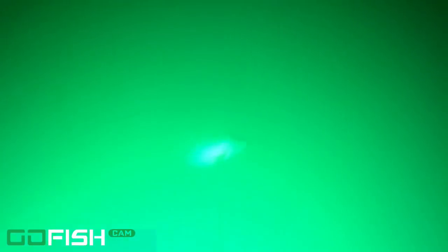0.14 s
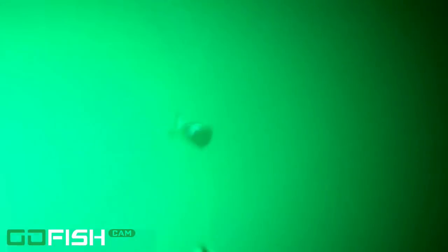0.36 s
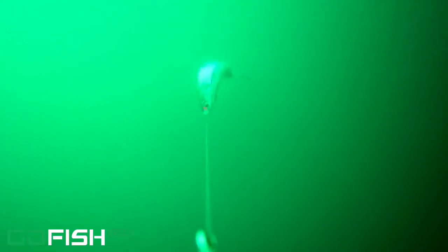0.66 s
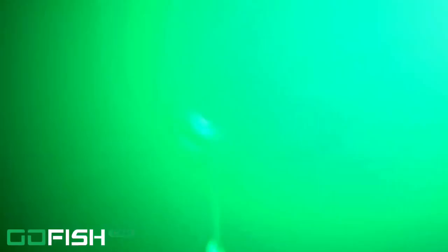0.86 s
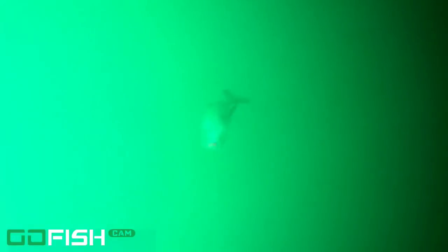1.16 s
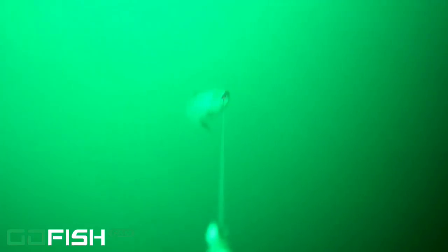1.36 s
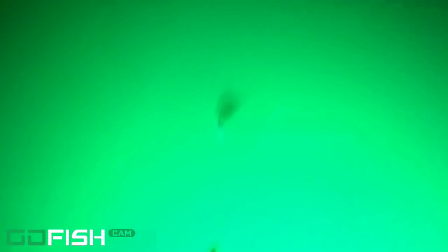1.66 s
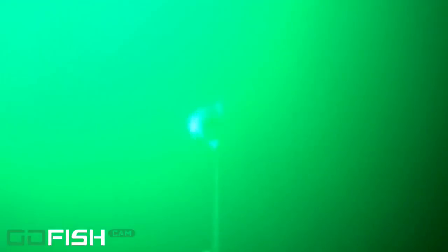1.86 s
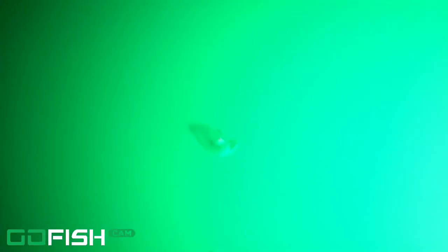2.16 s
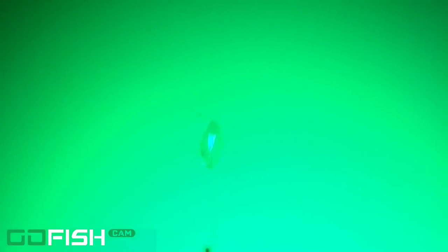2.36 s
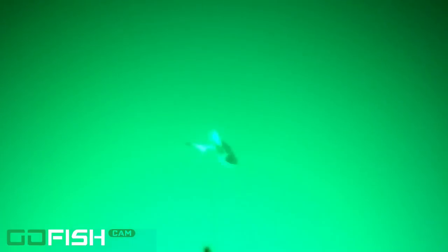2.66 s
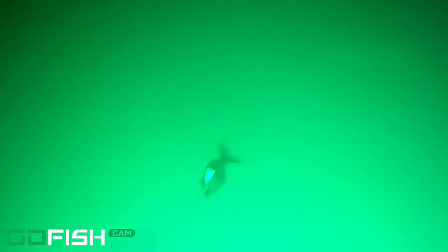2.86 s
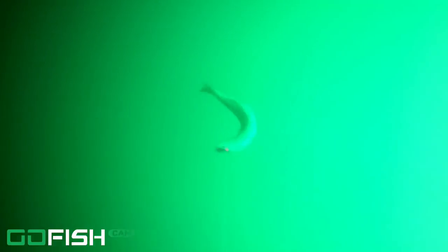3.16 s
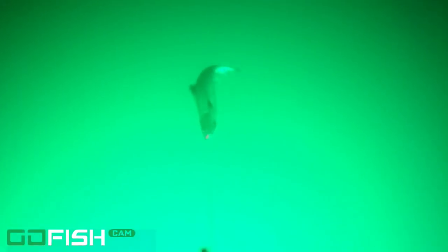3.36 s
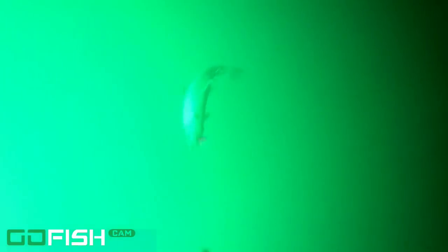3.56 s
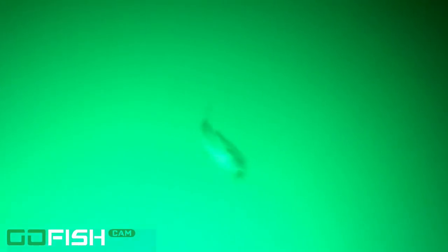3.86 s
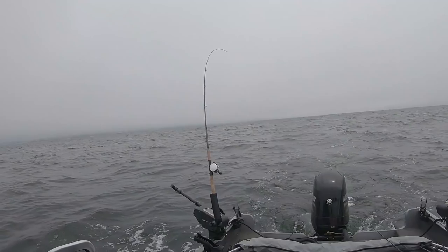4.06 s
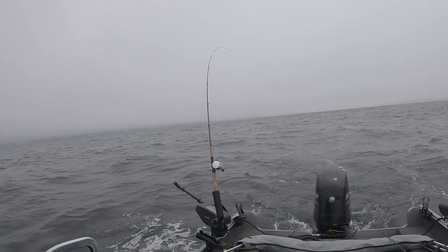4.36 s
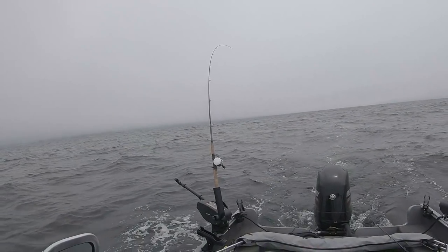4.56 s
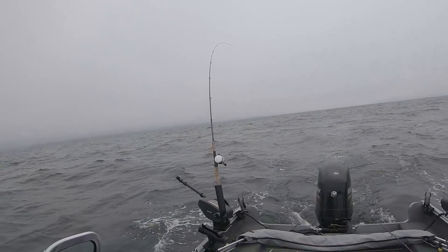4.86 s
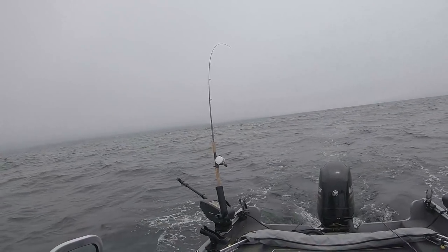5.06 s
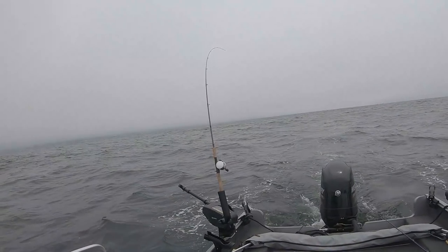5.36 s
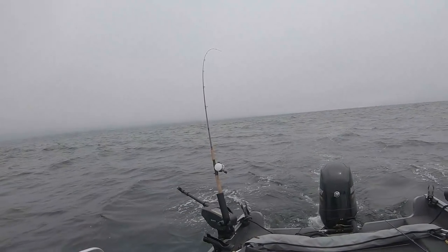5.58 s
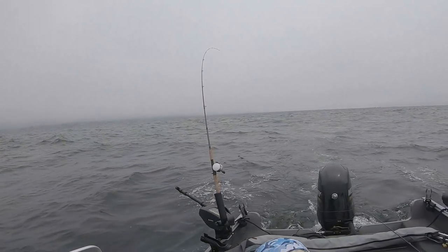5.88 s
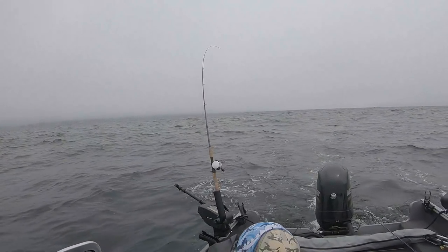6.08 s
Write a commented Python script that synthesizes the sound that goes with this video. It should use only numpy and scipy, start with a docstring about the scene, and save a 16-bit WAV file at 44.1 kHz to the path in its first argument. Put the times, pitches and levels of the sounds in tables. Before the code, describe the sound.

Harsh irregular chattering and squeaky rattles of fishing tackle underwater over hissing water, then a click and a low outboard throb with soft wake.

```python
"""Hard chattering bursts at close range: fishing tackle jerked by a hooked fish against a towed underwater camera.
Each catch sends stick-slip pulses through the ringing housing; single swivel knocks ring it brightly.
The taut line hums over streaming water and hiss; gain control ducks everything after a hard jerk, and peaks clip.
After a click the place is the deck: an outboard throbs as harmonics of its firing rate, the wake hisses as
shaped noise with ringing droplets, the hull rumbles and thumps, and wind noise picks up at the microphone."""
import sys
import numpy as np
from scipy import signal
from scipy.fft import rfft, irfft, next_fast_len
from scipy.io import wavfile
from scipy.ndimage import uniform_filter1d, map_coordinates

SR = 44100
rng = np.random.default_rng(int(sys.argv[2]) if len(sys.argv) > 2 else 0)


def bounce(signal):
    """Save signal as a 16-bit WAV file at the path given by the first command-line argument."""
    frames = np.transpose(np.atleast_2d(signal))
    limited = np.clip(frames, -1, 1)
    pcm = np.round(limited * 32767).astype(np.int16)
    wavfile.write(sys.argv[1], SR, pcm)


N = 274288
CUT_S = 4.085  # from under water to the deck


def amp(db):
    """Amplitude factor of a level in dB."""
    return 10 ** (np.asarray(db) / 20)


def unit(x):
    """Scale to rms 1."""
    return x / np.sqrt(np.mean(x ** 2) + 1e-20)


def along(points, hz):
    """Interpolate (Hz, value) points on a log frequency axis."""
    point_hz, value = np.transpose(points)
    return np.interp(np.log(hz + 1), np.log(point_hz + 1), value)


def curve(points):
    """Interpolate (s, value) points to one value per sample."""
    point_s, value = np.transpose(points)
    return np.interp(np.arange(N) / SR, point_s, value)


def wobble(rate):
    """A smooth random curve with rate knots a second."""
    knots = rng.standard_normal(int(N * rate / SR) + 4)
    return map_coordinates(knots, [np.arange(N) * rate / SR])


def filtered(x, response):
    """Multiply the spectrum of x by a response of frequency."""
    size = next_fast_len(len(x) + 4096)
    spectrum = rfft(x, size) * response(np.fft.rfftfreq(size, 1 / SR))
    return irfft(spectrum, size)[:len(x)]


def noise(color):
    """Noise of rms 1, coloured by (Hz, relative dB) points."""
    return unit(filtered(rng.standard_normal(N), lambda hz: amp(along(color, hz))))


def add(track, s, sound):
    """Mix a sound into the track at time s."""
    part = track[max(round(s * SR), 0):][:len(sound)]
    part += sound[:len(part)]


def bell(hz, centre_hz, width_hz):
    """Gain of one resonance, 1 at its centre."""
    return 1 / np.sqrt(1 + (2 * (hz - centre_hz) / width_hz) ** 2)


def hiss():
    """Steady electronic hiss, noise that rises towards the treble."""
    # electronics colour: pitch_hz [Hz], relative_db [dB]
    hiss_color = [(100, -17), (5000, 4.5), (9000, 7), (15500, 8)]
    return amp(-45.5) * noise(hiss_color)


def flow():
    """Water streams past the housing; eddies sway the level of its coloured noise."""
    # flow colour: pitch_hz [Hz], relative_db [dB]
    flow_color = [(30, -24), (90, -20.5), (180, -11), (300, -6.5), (480, 3), (700, -2.5), (950, -3.5),
                  (1170, 2.5), (1400, -17.5), (2000, -7.5), (2600, -3), (2900, -1.5), (3300, -3),
                  (3750, -17), (3980, -3.5), (4300, -8.5), (5500, -20.5), (9000, -56)]
    eddies_db = 1.8 * wobble(30)
    return amp(-40.0 + eddies_db) * noise(flow_color)


def hull_rumble():
    """The hull rumbles as low noise with a swaying level."""
    # rumble colour: pitch_hz [Hz], relative_db [dB]
    hull_color = [(20, -20), (32, 3), (55, 1), (100, -2.5), (150, 1.5), (200, -8), (250, -10), (330, -25),
                  (430, -18.5), (520, -24), (800, -67)]
    return amp(-40.0 + 1.3 * wobble(19)) * noise(hull_color)


def wind():
    """Gusts buffet the microphone as swelling low noise."""
    # gust strength: time_s [s], level_db [dB]
    gust_level = [(5.62, -63), (5.71, -34.5), (5.80, -38), (5.85, -51), (5.92, -33), (6.06, -30.5),
                  (6.13, -32), (6.22, -38)]
    # buffeting colour: pitch_hz [Hz], relative_db [dB]
    buffet_color = [(25, -25), (55, -3.5), (85, 1.5), (125, 1), (160, -18), (260, -26), (500, -68),
                    (1500, -86)]
    return amp(curve(gust_level)) * noise(buffet_color)


def droplets(rate=280, pitch_hz=1700, spread=0.565, cycles=5, size_db=1.0):
    """Small bubbles and drops in the wake, rate a second, each a short damped ring."""
    count = int(rate * N / SR)
    t = np.arange(400) / SR
    hz = np.clip(pitch_hz * np.exp(spread * rng.standard_normal((count, 1))), 600, 6000)
    age = t * hz / cycles
    strength = amp(size_db * np.minimum(rng.exponential(size=(count, 1)), 4))
    rings = strength * age * np.exp(-2 * age) * np.sin(2 * np.pi * hz * t)
    at = rng.integers(N, size=(count, 1)) + np.arange(len(t))
    return unit(np.bincount(at.ravel(), rings.ravel(), N)[:N])


def wake():
    """Churning water hisses and bubbles; foam fizzes mainly where the wake breaks hardest."""
    # strength of the wake: time_s [s], relative_db [dB]
    wash_level = [(4.1, -55), (4.55, -52), (4.8, -50.5), (4.92, -55.5), (5.25, -56.5), (5.5, -55),
                  (6.22, -55.5)]
    # wake colour: pitch_hz [Hz], relative_db [dB]
    wake_color = [(150, -39), (260, -14), (400, -21), (650, -22), (900, -22), (1200, -16), (2200, -20),
                  (3500, -26.5), (5000, -28.5), (6200, -31.5), (7200, -43.5), (9000, -58), (12000, -85)]
    wake_db = curve(wash_level)
    churn = amp(wake_db + 5.5 + wobble(35)) * (noise(wake_color) + amp(-5.0) * droplets())
    foam_color = [(1000, -37), (2400, -1), (3400, 3.5), (4300, -34), (6200, -7.5), (8000, -28), (12000, -77.5)]
    # twice the dB swing of the churn
    foam = amp(2 * wake_db + 48) * noise(foam_color)
    return churn + foam


def splashes():
    """Brief puffs of spray against the boat, noise around one pitch that swells and dies."""
    # splashes: start_s [s], relative_db [dB], centre_hz [Hz], width_hz [Hz, before sharpening],
    # life_s [s, from start to fullest]
    splash_rows = [(4.862, -31, 1300, 5500, 0.0088), (5.42, -38, 4830, 1610, 0.0043),
                   (5.746, -30, 900, 3020, 0.0041)]
    out, t = np.zeros(N), np.arange(SR // 8) / SR
    for start_s, db, centre_hz, width_hz, life_s in splash_rows:
        spray = unit(filtered(rng.standard_normal(len(t)), lambda hz: bell(hz, centre_hz, width_hz) ** 5))
        add(out, start_s, amp(db) * t / life_s * np.exp(-t / life_s) * spray)
    return out


def thumps(cycles=0.29):
    """Heavy, damped pushes on the boat that die within a cycle or two."""
    # dull thumps: start_s [s], peak_db [dB], soft_hz [Hz above which a soft contact stops ringing the boat]
    thump_rows = [(4.845, -19, 1200), (4.8637, -8.5, 900), (4.870, -19, 1200), (4.876, -15, 90),
                  (5.744, -23.5, 260)]
    # what they ring with: pitch_hz [Hz], relative_db [dB]
    thump_modes = [(90, -7), (300, 3), (500, -1.5)]
    out, t = np.zeros(N), np.arange(SR // 8) / SR
    for start_s, peak_db, soft_hz in thump_rows:
        push = np.zeros(len(t))
        for hz, db in thump_modes:
            softness = 1 / (1 + (hz / soft_hz) ** 4)
            envelope = t * hz * np.exp(-t * hz / cycles)
            push += amp(db) * softness * envelope * np.sin(2 * np.pi * hz * t)
        add(out, start_s, amp(peak_db) * push / np.abs(push).max())
    return out


def outboard(firing_hz=39.4, drift=0.01122, flutter_db=1.0):
    """The firing throb swells in the hull; its higher orders drone on and flutter."""
    # strength of the throb: time_s [s], relative_db [dB]
    throb_level = [(4.1, -35.5), (4.8, -34.5), (4.93, -28.5), (5.3, -29.5), (5.6, -35.5), (5.8, -28.5),
                   (6.13, -49), (6.22, -22)]
    # engine orders: multiple of the firing rate [ratio], relative_db [dB]; the first is the throb itself
    motor_orders = [(1, 0), (2, -12), (3, -34), (3.5, -23.5), (4, -13.5), (6, -20), (11, -24), (14, -36),
                    (17, -40.5)]
    phase = 2 * np.pi * np.cumsum(firing_hz * (1 + drift * wobble(7.2))) / SR
    throb = amp(curve(throb_level) - 2.5) * np.sin(phase)
    drone = np.zeros(N)
    for multiple, db in motor_orders[1:]:
        order = np.sin(multiple * phase + 2 * np.pi * rng.random())
        drone += amp(db + flutter_db * wobble(4.5)) * order
    return np.sqrt(2) * (throb + amp(-37.5) * drone)


def deck():
    """On deck: hull, wind and water around the outboard."""
    return hull_rumble() + wind() + wake() + splashes() + thumps() + outboard()


def line_pitch(pull, slack_hz=536, stretch=.25, lag_s=.07):
    """Pull raises the pitch of the line, by the stretch at full pull; its tension evens out over lag_s."""
    return slack_hz * (1 + stretch * uniform_filter1d(np.minimum(pull, 1), int(lag_s * SR)))


def line_hum(line_hz, usual_db=-44, waver=0.03635, flutter_db=4.5, trim_db=-3.0):
    """Eddies peel off the taut line and make it sing unsteadily, now and then swelling."""
    # the line catches the flow: centre_s [s], half_length_s [s], relative_db [dB]
    line_swells = [(0.355, .035, -43.5), (.665, .03, -31.5), (0.796, 0.0071, -35), (.885, 0.017, -37),
                   (1.508, 0.029, -33), (2.945, 0.015, -36), (3.57, .025, -37), (3.963, 0.021, -28.5)]
    t = np.arange(N) / SR
    level = amp(usual_db)
    for centre_s, half_s, db in line_swells:
        level = level + amp(db) * np.exp(-((t - centre_s) / half_s) ** 2)
    phase = 2 * np.pi * np.cumsum(line_hz * (1 + waver * wobble(110))) / SR
    return amp(trim_db) * level * unit(np.sin(phase) * amp(flutter_db * wobble(45)))


def contact(body_db, ring_hz, ring_db, edge_db, spot_db=2.5, size=2048, count=80):
    """The housing's answer to one contact; where the tackle touches sets the ring and the share of low body."""
    # housing under water: pitch_hz [Hz], relative_db [dB]
    housing_color = [(60, -50), (400, -26.5), (750, -17), (1100, -7), (1400, -2), (1900, -1), (2400, 5.5),
                     (2900, 1), (3150, -3), (3500, -3), (4000, -11), (4500, -25), (5200, -25),
                     (6200, -57.5), (12000, -60)]
    # its resonances: centre_hz [Hz], width_hz [Hz, before squaring], added_db [dB against the plain housing]
    shell_modes = [(1194, 165, 3.5), (1480, 200, -6.5), (2923, 270, 4), (3990, 130, -6.5)]
    hz = np.fft.rfftfreq(size, 1 / SR)
    shell = 1 + sum(amp(db) * bell(hz, centre, width) ** 2 for centre, width, db in shell_modes)
    ring = 1 + amp(ring_db) * bell(hz, ring_hz, 423) ** 2
    edge = amp(along([(3000, 0), (4800, edge_db)], hz))
    gain = amp(along(housing_color, hz)) * shell * ring * edge
    # set the body below about 1900 Hz against the ring above it
    low = 1 / (1 + (hz / 1900) ** 8)
    share = np.linalg.norm(gain * low) / np.linalg.norm(gain * (1 - low))
    gain = gain * (amp(body_db) / share) ** low
    # every spot on the housing stresses other overtones
    gain = gain * amp(spot_db * map_coordinates(rng.standard_normal(count), [hz / hz[-1] * (count - 1)]))
    # minimum phase: the ring follows the contact
    cepstrum = irfft(np.log(gain + 1e-6))
    fold = np.r_[1, np.full(size // 2 - 1, 2), 1, np.zeros(size // 2 - 1)]
    return irfft(np.exp(rfft(cepstrum * fold)))[:size // 2]


def swivel():
    """Single hard contacts of the swivel ring the housing brightly."""
    # contacts: start_s [s], peak_db [dB]
    swivel_ticks = [(0.016, -4), (.327, -12.5), (0.793, -16), (1.038, -9.5), (1.097, -22), (1.187, -7.5),
                    (1.206, -6), (1.261, -6), (1.327, -2.5), (1.386, -10.5), (1.459, -3.5), (1.919, -2.5),
                    (2.013, -17), (2.393, -12), (2.530, -9.5), (2.616, -8), (2.625, -5), (2.813, -12.5),
                    (3.266, -2.5), (3.19, -12.5), (3.857, -13)]
    out = np.zeros(N)
    for start_s, peak_db in swivel_ticks:
        tick = contact(body_db=-0.5, ring_hz=2735, ring_db=7, edge_db=21)
        add(out, start_s, amp(peak_db) * tick / np.abs(tick).max())
    return out


def pulling():
    """Each tug rises, holds while it grows or fades, and lets go; returns the pull and its low body in dB."""
    # tugs of the fish: start_s [s], length_s [s], relative_db [dB], growth_db [dB from start to end],
    # body_db [dB, low knocking body against the ring]
    fish_tugs = [(0.02, 0.0047, -17.5, -7, 6), (.039, .014, 2.5, 3, -7), (0.066, 0.03, -20.5, 2, -8),
                 (0.131, 0.0056, -21, 3, 2.5), (0.193, 0.012, -4, 5.5, -12.5),
                 (0.228, 0.044, -7, -10.5, -12), (0.386, .011, -1.5, 7, -8), (0.433, 0.022, -9, 0, -8),
                 (0.46, 0.0056, -1, -1.5, -10), (0.543, 0.023, -8.5, 4, -5), (.577, 0.12, -9.5, -6.5, -11),
                 (0.793, 0.014, -15.5, 1, 1.5), (0.842, .008, -9.5, -1.5, -17.5),
                 (0.867, 0.019, -10.5, -4, -8.5), (.901, 0.03, -12.5, -8.5, -11.5),
                 (1.029, 0.012, -11.5, 12.5, -2), (1.084, 0.033, -16, 5.5, -9),
                 (1.125, 0.028, -11.5, -0.5, -7), (1.195, 0.029, -20.5, 6, -1), (1.26, .014, -23.5, 1, 4),
                 (1.326, 0.011, -15, -3.5, 1), (1.344, .015, 1, 0.5, -15.5), (1.435, 0.028, -21, 6, -4.5),
                 (1.504, 0.026, -10, 3, -8), (1.541, 0.02, -8, -12.5, -15.5), (1.697, 0.019, -4.5, 4, -5.5),
                 (1.731, 0.0205, 4, -2.5, -17), (1.79, 0.025, -2, -2, -7.5), (1.824, 0.011, -11, -1, -10),
                 (1.914, 0.018, -19.5, 3, -1), (1.954, .008, -18.5, -1.5, -4), (1.988, 0.028, -23.5, 5, -2),
                 (2.05, .028, -25, -1, -2), (2.242, 0.0096, -26.5, -1, -23.5), (2.33, .016, -21.5, 5, 0),
                 (2.377, .02, -28, 7, 0), (2.514, 0.022, -24, 3, -8), (2.621, .012, -20.5, -8.5, -15),
                 (2.706, 0.06, -24, -6.5, -2.5), (2.874, 0.0054, -27, -3.5, -12.5),
                 (2.899, 0.014, -23, -3, -0.5), (2.958, 0.034, -6, 6.5, -13.5),
                 (3.005, 0.0584, -11.5, -9.5, -15), (3.076, 0.017, -10, -3, -4.5),
                 (3.113, 0.012, -9.5, -1, -8.5), (3.139, .026, -13.5, 5, -6.5), (3.234, 0.019, -25, 10, 4),
                 (3.266, .017, -6.5, 1.5, -8), (3.299, 0.028, -1.5, 1, -15.5),
                 (3.334, 0.025, -6.5, -13, -13), (3.373, 0.013, -12, 8, -8), (3.398, 0.027, -10, -14, -15),
                 (3.474, 0.011, -28, 1, 0), (3.557, 0.018, -16.5, -5, -2.5), (3.595, .035, -2.5, 1, -16.5),
                 (3.63, 0.034, -14.5, -4.5, -7), (3.689, .004, -9.5, 2, -5.5), (3.707, 0.022, 0, 1.5, -15),
                 (3.755, 0.0512, -13.5, -2, -2.5), (3.855, 0.012, -12.5, -1, -5.5),
                 (3.891, 0.013, -5, 7, -16.5), (3.911, .018, -10, -5, -3.5), (3.936, 0.075, -4, 2.5, -14)]
    rise_s, fall_s = .0037, .00338
    # the tackle shakes lightly before and after each tug
    shake_db, shake_rise_s, shake_fall_s = -21, 0.013, .014
    # idle rattle between tugs: level, its swing, knots a second and low body
    slack_db, slack_swing_db, slack_per_s, slack_body_db = -39, 3.5, 32, -6.5
    t = np.arange(N) / SR
    power = amp(slack_db + slack_swing_db * wobble(slack_per_s)) ** 2
    body = power * slack_body_db  # weighted by power
    for start_s, length_s, db, growth_db, body_db in fish_tugs:
        end_s = start_s + length_s
        near = slice(max(int((start_s - .1) * SR), 0), int((end_s + .15) * SR))
        early = np.maximum(start_s - t[near], 0)
        late = np.maximum(t[near] - end_s, 0)
        hold = amp(db + growth_db * np.interp(t[near], [start_s, end_s], [-.5, .5]))
        grip = hold * np.exp(-early / rise_s - late / fall_s)
        shake = hold * amp(shake_db) * np.exp(-early / shake_rise_s - late / shake_fall_s)
        power[near] += grip ** 2 + shake ** 2
        body[near] += grip ** 2 * body_db + shake ** 2 * slack_body_db
    return np.sqrt(power), body / power


def slips(size, rate_hz, bend=.09, scatter=.035, size_db=2.5, count=128):
    """Stick-slip pulses, their rate bending up or down as the tackle swings."""
    swing = map_coordinates(rng.standard_normal(size // 600 + 4), [np.arange(size) / 600])
    turns = np.cumsum(rate_hz * np.exp(bend * swing)) / SR
    due = np.arange(count) + rng.random() + scatter * rng.standard_normal(count)
    strength = amp(size_db * rng.standard_normal(count)) * (due < turns[-1])
    at = np.interp(due, turns, np.arange(size)).astype(int)
    return unit(np.bincount(at, strength, size))


def tackle(pull, low_db, line_hz, count=200):
    """The tackle catches anew about every 20 ms: hard pulls squeak in stick-slip near the line's pitch,
    light ones rattle loosely and brightly."""
    # settings when slack and when tight
    loose_judder_db, tight_judder_db = 2.5, 0.8
    loose_stray_db, tight_stray_db = 9, -8.5  # stray contacts against the regular slips
    loose_edge_db, tight_edge_db = 10, -1.0  # treble of the contact
    squeal_db = 2  # a tight pull drives the ring harder
    ring_hz, ring_spread = 2705, .035  # the ring wanders as the tackle shifts on the housing
    rate_spread, body_spread_db, droop_db = .22, 2.0, 0.9
    stray_rate = 600  # a second when slack
    out = np.zeros(N)
    lock = np.interp(20 * np.log10(pull), [-24, -4], [0, 1])  # 0 slack, 1 tight
    judder_db = loose_judder_db * (1 - lock) + tight_judder_db * lock
    pull = pull * amp(judder_db * wobble(170))
    ends = np.arange(1, count + 1) + rng.uniform(-.35, .35, count)
    edges = np.r_[0, ends * CUT_S * SR / count].astype(int)
    for a, b, (pace, body, spot) in zip(edges, edges[1:], rng.standard_normal((count, 3))):
        grip = pull[a:b] * amp(droop_db * np.linspace(.5, -.5, b - a))
        tight = np.average(lock[a:b], weights=grip ** 2)
        paced = slips(b - a, line_hz[a] * np.exp(rate_spread * pace))
        # stray contacts: single ticks when slack, a faint dense scrape when tight
        hits = rng.random(b - a) < stray_rate * (1 + 8 * tight) / SR
        stray = unit(hits * rng.standard_normal(b - a))
        stray_db = loose_stray_db * (1 - tight) + tight_stray_db * tight
        force = (paced + amp(stray_db) * stray) * grip
        body_db = np.average(low_db[a:b], weights=grip ** 2) + body_spread_db * body
        edge_db = loose_edge_db * (1 - tight) + tight_edge_db * tight
        answer = contact(body_db, ring_hz * np.exp(ring_spread * spot), squeal_db * tight, edge_db)
        burst = signal.fftconvolve(force, answer)
        # the grip alone sets the loudness of the catch
        level = amp(-3) * np.linalg.norm(grip) / (np.linalg.norm(burst) + 1e-12)
        add(out, a / SR, level * burst)
    return out


def underwater():
    """One pull rattles the tackle and tightens the humming line, over flow and hiss."""
    pull, low_db = pulling()
    line_hz = line_pitch(pull)
    return hiss() + flow() + line_hum(line_hz) + swivel() + tackle(pull, low_db, line_hz)


def scene():
    """Under water first, then on deck, with a click at the change."""
    out = np.where(np.arange(N) / SR < CUT_S, underwater(), deck())
    t = np.arange(SR // 100) / SR
    click = np.exp(-t / 0.00015) * np.cos(2 * np.pi * 1750 * t)
    add(out, CUT_S, amp(-4.0) * click)
    return out[None]


def gain_control(x, threshold_db, slope, sense_s, lag_s, release_db):
    """Turns loud sound down a little late, then recovers by release_db a second."""
    keep = np.exp(-1 / (sense_s * SR))
    level_db = 10 * np.log10(signal.lfilter([1 - keep], [1, -keep], x ** 2) + 1e-12)
    t = np.arange(N) / SR
    over_db = slope * np.maximum(level_db - threshold_db, 0)
    # the deepest cut so far holds while it recovers
    cut_db = np.maximum.accumulate(over_db + release_db * t) - release_db * t
    return x * amp(-np.interp(t - lag_s, t, cut_db))


def record(dry):
    """Gain control, hard overload at full scale and a sharp limit of the treble."""
    held = gain_control(dry[0], threshold_db=-22.5, slope=0.41, sense_s=0.0095, lag_s=.007, release_db=88)
    top_hz = 15900
    return filtered(np.clip(held, -1, 1), lambda hz: hz < top_hz)[None]


dry = scene()
out = record(dry)
bounce(out)
```